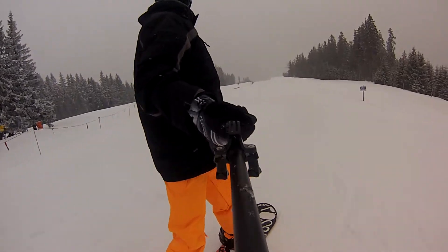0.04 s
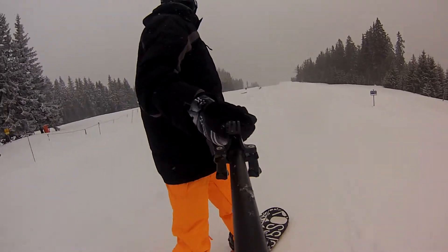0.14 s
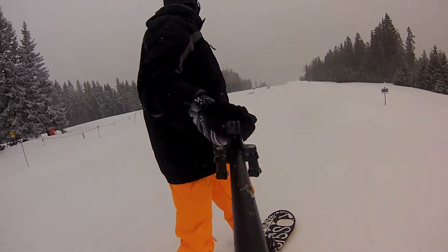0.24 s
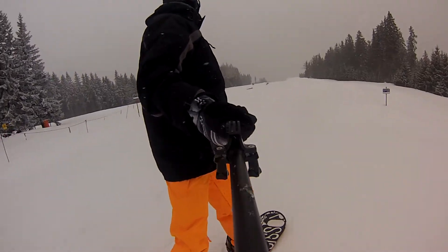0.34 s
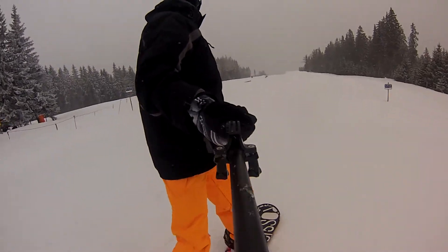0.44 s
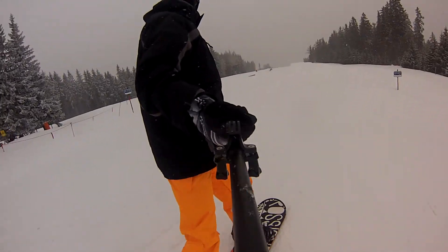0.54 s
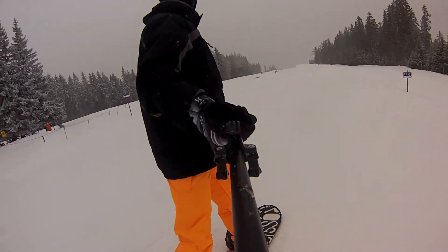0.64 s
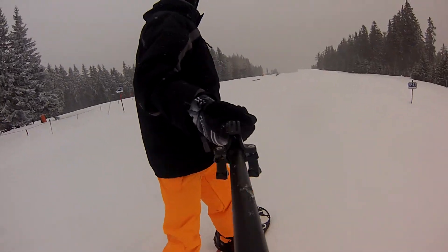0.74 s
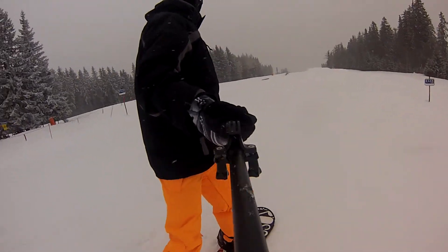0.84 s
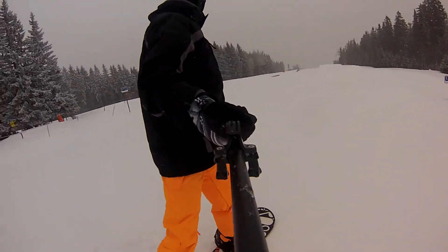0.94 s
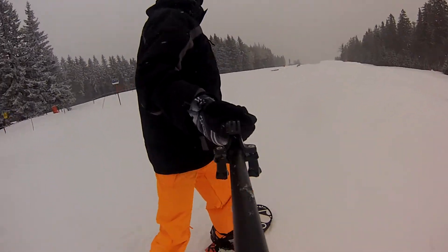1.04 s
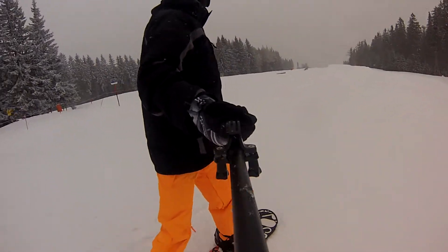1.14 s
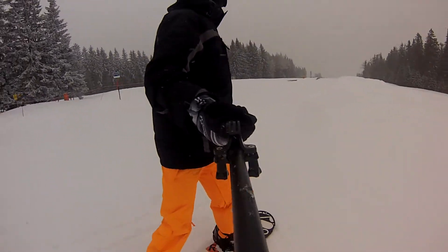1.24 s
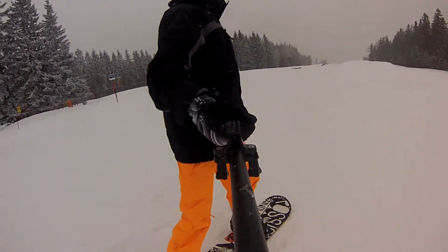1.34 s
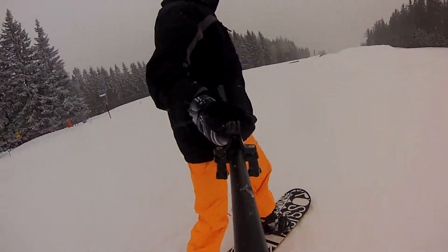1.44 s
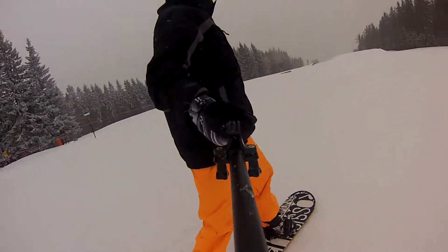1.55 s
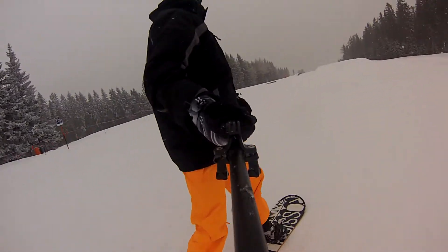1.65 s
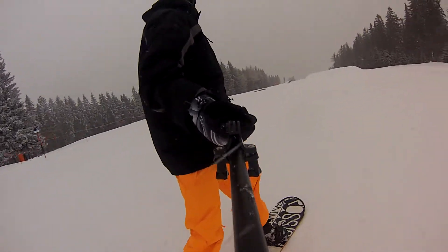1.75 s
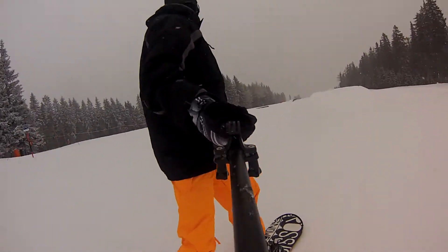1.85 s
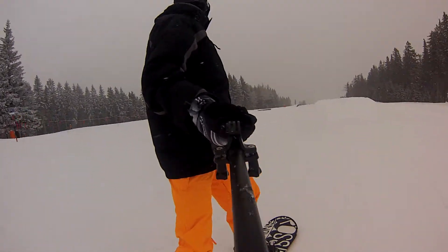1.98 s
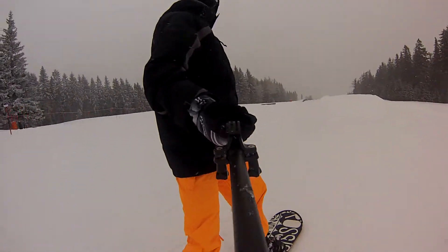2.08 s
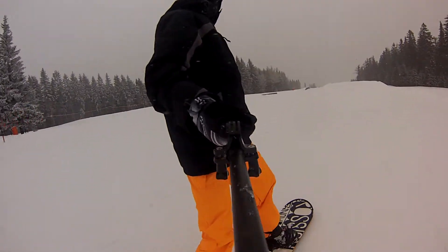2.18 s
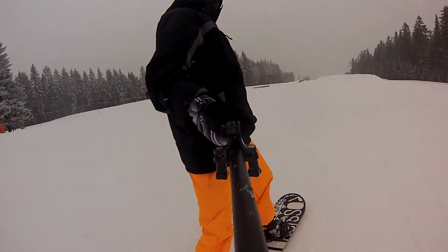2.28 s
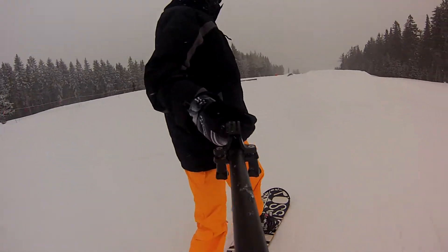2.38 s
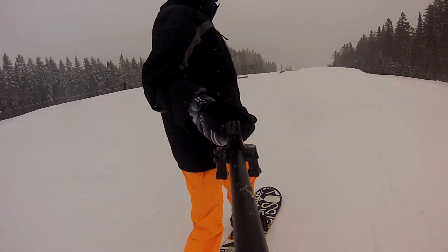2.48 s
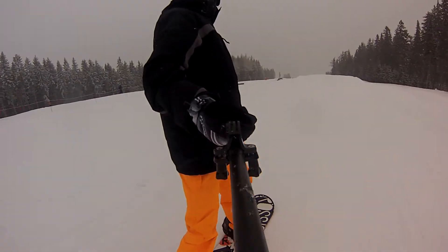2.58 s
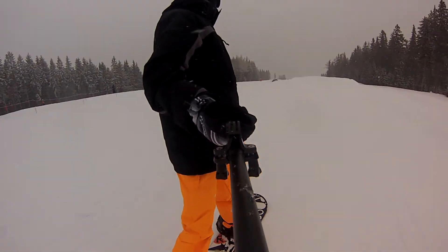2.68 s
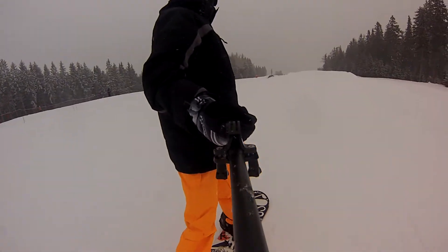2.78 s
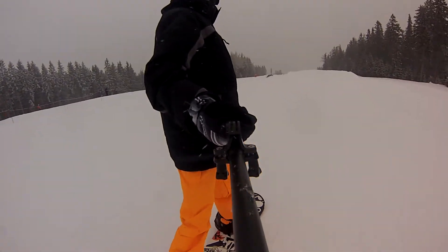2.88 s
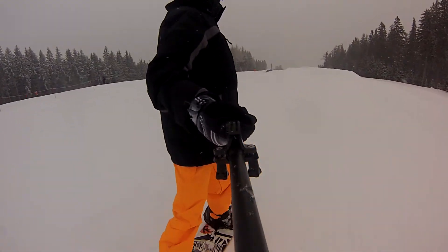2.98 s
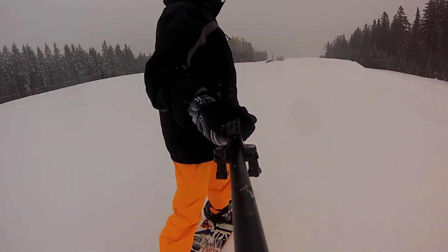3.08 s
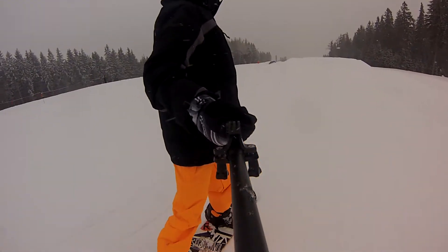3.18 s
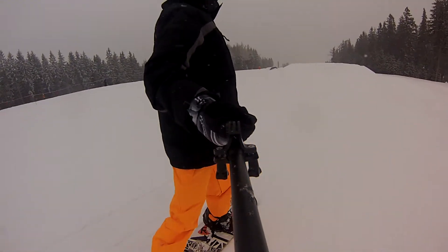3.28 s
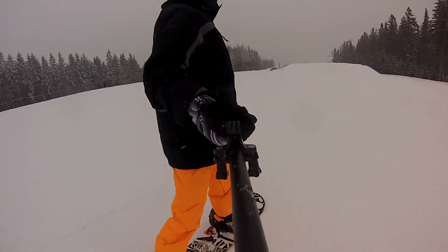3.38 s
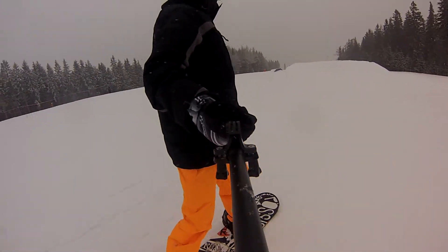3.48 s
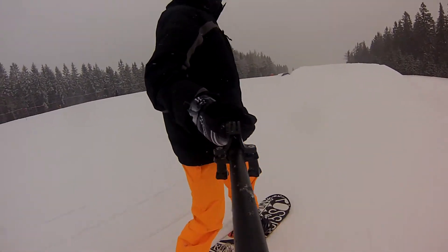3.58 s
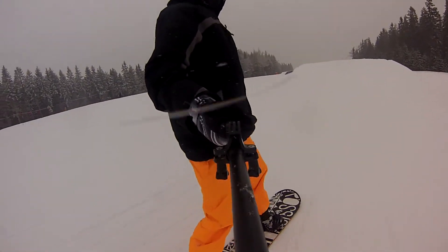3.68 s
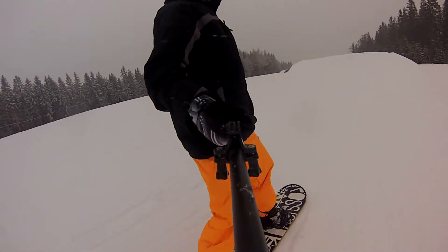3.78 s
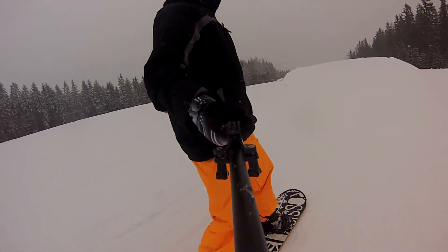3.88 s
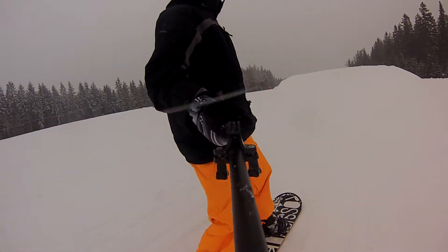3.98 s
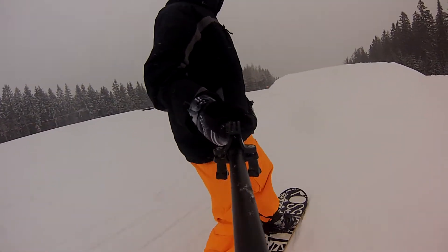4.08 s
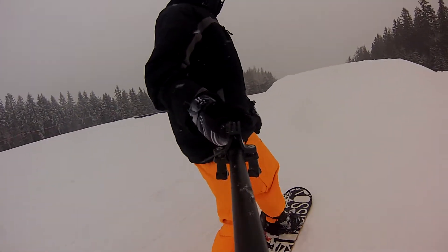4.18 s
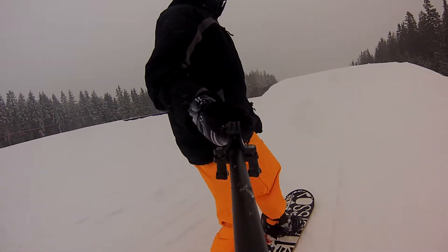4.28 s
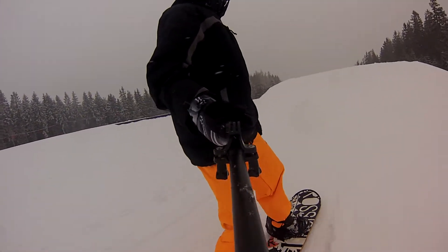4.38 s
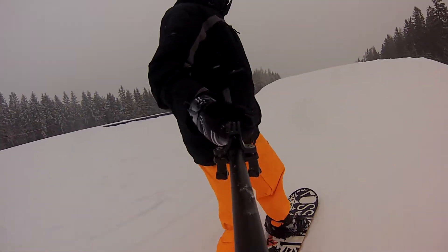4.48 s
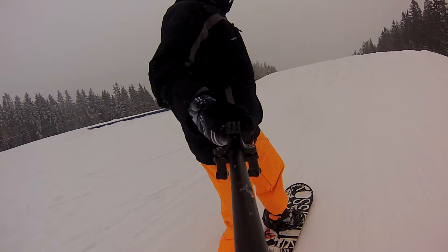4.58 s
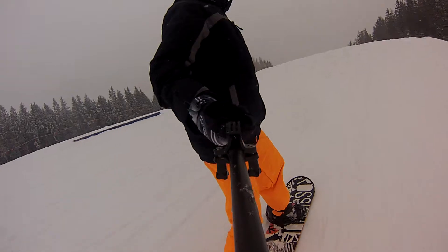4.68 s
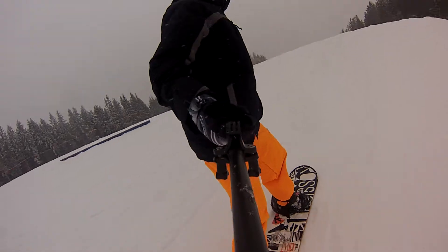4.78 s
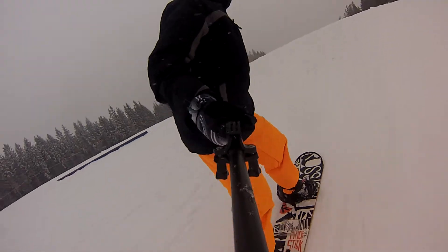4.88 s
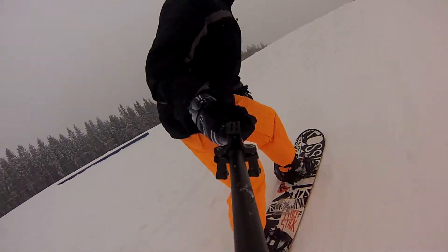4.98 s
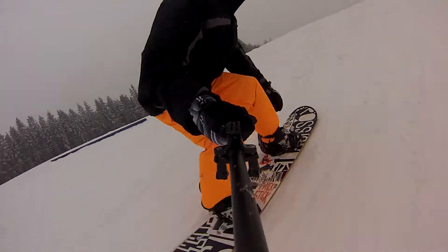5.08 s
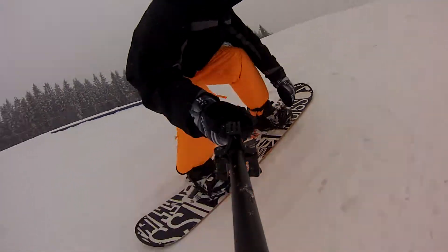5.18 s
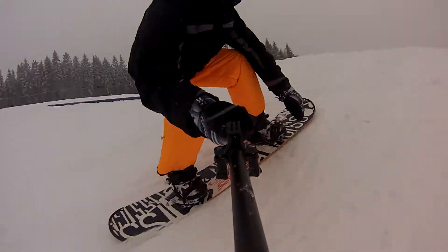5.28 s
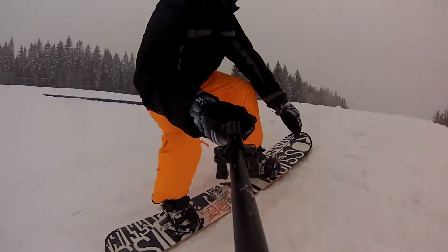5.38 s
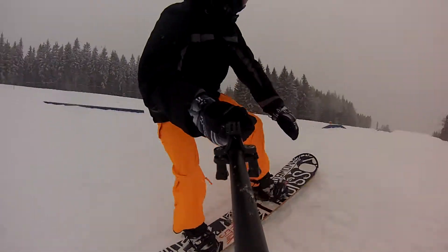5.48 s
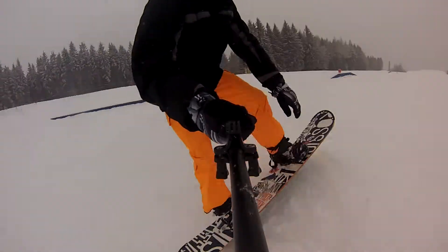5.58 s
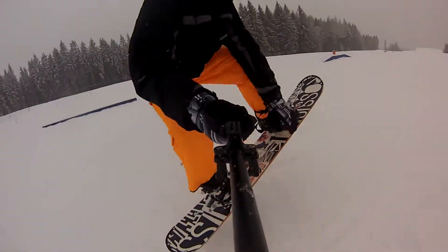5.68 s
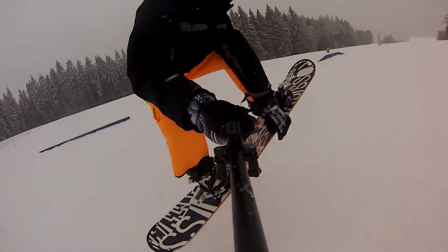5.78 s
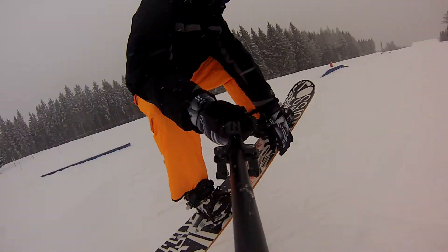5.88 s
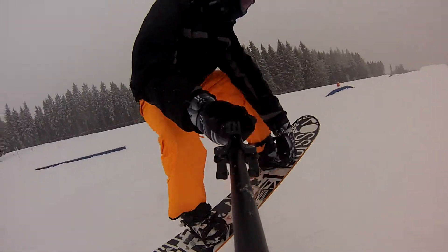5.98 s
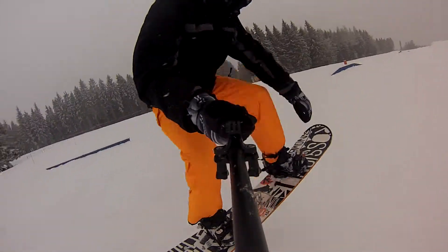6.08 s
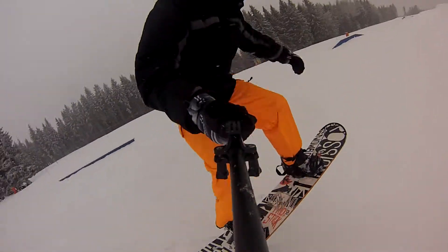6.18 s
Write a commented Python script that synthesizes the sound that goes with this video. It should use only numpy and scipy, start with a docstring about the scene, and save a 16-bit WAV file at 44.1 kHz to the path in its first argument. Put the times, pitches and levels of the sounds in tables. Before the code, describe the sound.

The microphone sits inside a sealed plastic camera case on a hand-held pole, outdoors in falling snow. Throughout, deep wind buffeting swells and sinks softly beneath a weak low drone and steady muffled air, while the snowboard's slide is only a faint boxy drone with fine dusty hiss. Snowflakes tick irregularly on the shell, dry and bright, denser from about 2 to 5 seconds, with sharper clicks near 2.2, 2.9 and 4.7. A slight knock and squeak come at 0.25; a soft rub around 1.4 and knocks from 1.6 to 1.9; single knocks near 3.1 and 4.1. From 5 the wind surges in deep thumps, the drone peaking at 5.3. Strong knocks cluster at 5.25 to 5.35 and 5.58 to 5.65, then from 5.83 to 6.2 a busy clatter mixes with scratchy rubs and very short, falling squeaks, ending abruptly in handling noise and wind.

```python
"""A snow slope in falling snow: a camera in a sealed plastic case rides on a hand-held pole by a snowboarder.
Wind buffets the case: slow noise that swells and sinks, over a weaker drone and a steady rush of air.
Knocks, rubs and squeaks come from the pole, and snowflakes tick on the walls; the board hisses faintly.
Knocks, rubs, flakes and board are pushes that ring the same modes (natural ringing tones) of the case."""
import sys
import numpy as np
from scipy.fft import rfft, irfft, next_fast_len
from scipy.io import wavfile
from scipy.ndimage import map_coordinates

SR = 44100
rng = np.random.default_rng(int(sys.argv[2]) if len(sys.argv) > 2 else 0)


def output_pcm(signal):
    """Save a mono or channel-first signal as 16-bit PCM at the path in sys.argv[1].

    Samples are clipped to [-1, 1] before scaling.
    """
    pcm = np.clip(np.atleast_2d(signal).T, -1, 1) * 32767
    wavfile.write(sys.argv[1], SR, np.round(pcm).astype(np.int16))


N = 275184

# Slow buffeting of the case over time. Columns: time_s, level_db
BUFFET_LEVEL = [(0, -32.5), (.4, -42.5), (1.0, -36.5), (1.35, -32.5), (1.74, -31.5), (1.9, -39.5),
                (2.15, -37), (2.45, -36.5), (2.8, -36), (3.15, -32.5), (3.6, -38.5), (3.95, -31.5),
                (4.3, -36.5), (4.8, -33), (5.1, -24), (5.33, -25.5), (5.55, -20), (5.63, -25.5),
                (5.74, -23), (5.95, -37), (6.05, -27), (6.15, -32.5), (6.24, -27)]
# Spectrum of the buffeting. Columns: frequency_hz, level_db (per Hz)
BUFFET_SPECTRUM = [(4, -30), (8, -9), (17, -3), (30, 0), (45, -2), (58, -8), (86, -22), (113, -30),
                   (170, -57), (290, -120)]
# Ringing modes of the plastic case. Columns: pitch_hz, width_hz, level_db
CASE_MODES = [(155, 81, -1), (324.4, 137, -4.5), (642, 200, 0.5), (801, 156, -1.5), (1355, 450, 3),
              (1524, 355, 3), (1716, 213, 3.5), (2156, 546, 5), (2993, 660, 1), (3500, 845, 1),
              (4857, 1220, 3.5), (5700, 580, -9.5), (6850, 1480, 2.5), (9030, 3650, 4.5),
              (10730, 3200, 4.5), (14350, 2600, -1)]
MODE_HZ, MODE_WIDTH_HZ, MODE_DB = np.transpose(CASE_MODES)

# Knocks that travel up the pole; the three ring levels are relative to the main ring.
# Columns: time_s, main_db (before the pushes below), thud_db, hollow_db, bright_db, strongest_bright_hz
KNOCKS_ON_POLE = [(0.2537, -42, -15, -23, 0, 3010), (1.2539, -42, -22, -26, -11, 2220),
                  (1.3843, -47, -6, -17, -16, 4740), (1.6307, -31, -11, -7.5, -21, 5030),
                  (1.708, -43, 5, -7.5, 6, 2140), (1.8495, -38.5, -4, -11.5, -24, 2970),
                  (1.9107, -44, -24, -19, -8, 2960), (3.0847, -36, -10, -8, -6, 4610),
                  (4.1211, -31.5, -17, -10, -16, 2240), (4.8448, -47, -42, -2, -12, 2190),
                  (5.045, -42, -15, -20, -6, 3300), (5.1627, -42, -12, -21, -7, 2060),
                  (5.2053, -44.5, -4, -2, -5, 2040), (5.213, -40.5, 2, -6, -16, 4630),
                  (5.2204, -47, -1, 3, -11, 2300), (5.2548, -25, -16, -9, -18, 2230),
                  (5.2646, -45, 13.5, -3, -3, 2020), (5.2763, -43, 6, 2, -13, 3340),
                  (5.3086, -23.5, -17, -11, -31, 2310), (5.3239, -35.5, 5, -2, -22, 2130),
                  (5.3362, -37, 0, 0, -20, 2000), (5.3447, -37, -5, -5, -11, 2140),
                  (5.4666, -39, -18, -18, -8, 2000), (5.5278, -55, -3, -3, -4, 2030),
                  (5.5792, -20, -19.5, -23, -16.5, 3730), (5.6091, -30.5, -15, -16, -11, 2780),
                  (5.6364, -30.5, -17, -19, -17, 2000), (5.655, -40, -18, -17, -16, 2180),
                  (5.7377, -43.5, -16, -20, -16, 3740), (5.8266, -35.5, -30, -19, -6, 4760),
                  (5.8436, -27.5, -33, -21, -32, 2100), (5.8612, -28.5, -32, -19, 0.5, 4840),
                  (5.8996, -29, -17, -8.5, -9, 3840), (5.9125, -34, -20, -11, -31, 3800),
                  (5.9216, -26, -18, -16, 2, 2850), (5.9348, -37.5, -32, -19, 10, 2220),
                  (5.948, -28, -29, -24, -34, 2190), (6.0166, -36, -18, -13, -11, 3880),
                  (6.0469, -31.5, -18, -19, -10.5, 2205), (6.0627, -30.5, -14, -14, -11, 3100),
                  (6.0775, -39, -24, -28, -15, 2950), (6.199, -28.5, -22, -17, -9, 2840)]
# Thud, hollow, main, gap, bright and highest ring of a knock. One column: frequency_hz
KNOCK_RING_HZ = [250, 700, 1500, 2200, 3700, 10000]
# Push on each of these rings, relative to its level. One column: push_db
KNOCK_PUSH_DB = [-3.5, -1.5, -7, -14.5, -4.5, -27]

# Rubbing on the pole; hollow and bright are relative to the push.
# Columns: start_s, loudest_s, end_s, push_db (at the loudest moment), hollow_db, bright_db, favoured_hz
RUBS_ON_POLE = [(1.293, 1.43, 1.515, -59, -4.5, -14, 1560), (5.503, 5.536, 5.77, -62, 4, 7.5, 1470),
                (5.834, 5.87, 5.92, -48.5, -25, -4, 1392), (5.891, 5.921, 5.958, -48.5, -10.5, 11.5, 1370),
                (6.01, 6.078, 6.148, -51.5, -21, -1, 1290), (6.163, 6.236, 6.3, -56.5, -16, 5.5, 1490)]
RUB_START_DB, RUB_END_DB = -8, -20.5  # relative to the loudest moment

# Big flakes; low and high ring are relative to the peak.
# Columns: time_s, peak_db (before the pushes below), strongest_ring_hz, low_db, high_db
BIG_FLAKES = [(0.3307, -29, 4800, -15, -9), (0.3434, -34, 4700, -13, -4), (0.389, -32.5, 5070, -14, -3),
              (0.7868, -34, 3070, -12.5, -6), (0.8026, -36, 2100, -14, -7), (0.9265, -28.5, 4740, -11, -5),
              (0.99, -34, 5270, -12, -11), (1.0176, -33.5, 4750, -19, -9), (1.1443, -33, 1990, -9.5, -11),
              (1.2552, -36, 2170, -3.5, -26), (1.3452, -33, 2060, -22, -12), (1.398, -32.5, 4740, -22, -7),
              (1.4623, -27.5, 4620, -8.5, -10), (1.5531, -33, 3580, -11, -23),
              (1.6714, -31.5, 4900, -15, -27), (1.709, -42, 2050, -14, -28.5), (1.733, -34, 2000, -11, 1),
              (1.7377, -32.5, 6900, -17, -10), (1.7868, -32.5, 5200, -11, -14),
              (1.8077, -34.5, 2930, -9, -5), (1.9283, -30, 3090, -14, -9), (1.935, -33, 6580, -18, -17),
              (1.9678, -33, 2246, -11, -10), (2.0174, -35, 4730, -17, -19), (2.0632, -38, 2790, -8, -19),
              (2.0874, -25, 4420, -13, -16), (2.0964, -30, 5330, -7, -10), (2.2106, -29.5, 4470, -7, -4),
              (2.2343, -23.5, 7100, -34, -25), (2.2472, -28, 3280, -7.5, -12),
              (2.4028, -34, 3020, -7.5, -26), (2.4136, -39.5, 3000, -3, -6), (2.5257, -33, 3700, -9, -20),
              (2.5401, -28.5, 5450, -11, -8), (2.5975, -61, 3040, -2, 15), (2.61, -29.5, 3030, -13, -5),
              (2.6923, -28.5, 5750, -20, -11), (2.7684, -32.5, 5100, -7, -5),
              (2.792, -25.5, 3140, -16.5, -16), (2.912, -22.5, 3016, -14.5, -22),
              (2.9647, -27, 2180, -14, -20), (3.0097, -32, 2320, -13, -19), (3.0901, -32.5, 4600, -8, -3),
              (3.1973, -35, 6770, -22, -12), (3.2273, -29.5, 2840, -16, -6), (3.2815, -31.5, 3540, -13, -6),
              (3.3037, -28.5, 3100, -14, -14.5), (3.3403, -31.5, 2030, -14, -22),
              (3.4648, -31.5, 2990, -10, -28), (3.487, -32, 2920, -17, -12),
              (3.5106, -27, 3180, -13.5, -20), (3.55, -27, 5000, -22, -10), (3.6323, -35, 2010, -20, -20),
              (3.65, -32, 6840, -21, -5), (3.681, -31.5, 3110, -9, -12), (3.6947, -33.5, 4860, -4, -28),
              (3.7014, -34, 4600, -1, -4), (3.717, -25, 2930, -15, -8), (3.7883, -38, 2240, -23, -17),
              (3.8614, -27.5, 5230, -20, -10), (3.8822, -30.5, 5020, -17, -8),
              (3.9632, -27.5, 2000, -16, -22), (4.0113, -31, 4770, -13, -23), (4.0184, -27, 2230, -16, -12),
              (4.087, -27.5, 4400, -8, -29.5), (4.0977, -29, 2240, -7, -19), (4.153, -34.5, 4600, -18, -13),
              (4.2059, -32.5, 4810, -4.5, -25), (4.333, -30, 2950, -20, -5),
              (4.3482, -29.5, 4680, -15, -18), (4.4164, -24.5, 4830, -14, -17),
              (4.4294, -30.5, 4690, -11, -11), (4.4584, -29, 2980, -18, -22), (4.5258, -37, 4800, -13, -18),
              (4.5328, -29, 3420, -16, -21), (4.5763, -31, 3430, -16, -19), (4.594, -37, 10800, -26, -1),
              (4.685, -38, 2300, -3, -6), (4.7008, -23, 5730, -13.5, -9), (4.7561, -38, 4940, -13, -14),
              (4.773, -35, 2050, -10, -21), (4.914, -34.5, 4550, -2.5, -12),
              (4.9383, -29.5, 2040, -12, -10), (5.04, -36, 6880, -21, -1), (5.3657, -29, 4860, -18, -12),
              (5.4014, -36.5, 3580, -8, -17), (5.4134, -30, 2000, -16, -11), (5.4193, -26, 4840, -25, -27),
              (5.5736, -26, 2300, -19, -19), (5.6096, -33, 2770, -14, -8), (5.6177, -30, 2060, -10, -8),
              (5.6423, -31, 3520, -10.5, -31), (6.0162, -27.5, 3760, -8.5, -34),
              (6.068, -18.5, 2900, -14, -8), (6.1401, -28.5, 3585, -20, -11),
              (6.1973, -32.5, 4740, -13, -15), (6.2344, -27.5, 4770, -15, -20)]
# Where the rings of a flake are given: three low, one main, one high. One column: frequency_hz
FLAKE_RING_HZ = [500, 1500, 3000, 5500, 11500]
# Push on each ring of a big flake, relative to its level. One column: push_db
FLAKE_PUSH_DB = [-35, -19, -6, -14.5, -6]
BIG_FLAKE_FALL_DB = 9  # each further piece of a breaking big flake is typically this much weaker
# Strength of the small flakes over time, before their spread. Columns: time_s, push_db
SMALL_FLAKE_LEVEL = [(0, -63.5), (1.4, -63.5), (2.1, -59), (2.8, -61.5), (3.6, -59.5), (4.9, -59.5),
                     (6.24, -65.5)]

# Squeaks in the grip of the pole. Columns: start_s, peak_db, pitch_hz (at the start)
GRIP_SQUEAKS = [(0.254, -49.5, 1200), (5.8603, -32, 1390), (5.899, -35, 1340), (5.9102, -26.5, 1340),
                (5.9403, -34.5, 1310), (6.018, -36, 1310), (6.0612, -32, 1245)]
SQUEAK_S, SAG_HZ_PER_S = 0.012, 3500  # length of a squeak, fall of its pitch

# The board's slide over the snow. Columns: time_s, level_db (before a small wobble)
SLIDE_LEVEL = [(0.0, -64), (0.78, -62.5), (1.3, -60), (1.72, -60.5), (2.14, -55.5), (2.78, -59.5),
               (3.81, -56.5), (4.45, -60), (4.97, -57.5), (5.14, -55.5), (5.58, -61.5), (5.91, -61),
               (6.05, -60), (6.24, -56.5)]
# How the slide pushes the case. Columns: frequency_hz, push_db
SLIDE_TILT = [(300, -3.5), (700, -4), (1500, 2), (2300, -15), (4000, -39)]
# How the fine snow dust pushes the case. Columns: frequency_hz, push_db
DUST_TILT = [(1500, -40), (2300, -7.5), (4700, -3), (7000, -3), (11000, -9), (14000, -7)]
DUST_DB, DUST_FOLLOWS = -66.5, 0.32  # mean level; share of the slide's level swings that the dust follows

# Drone of the wind over time. Columns: time_s, level_db (before a small wobble)
DRONE_LEVEL = [(0, -62.5), (.8, -62.5), (1.42, -56.5), (1.7, -60), (2.5, -57), (3.04, -62), (3.45, -58),
               (4.2, -57.5), (4.7, -59), (5.15, -53), (5.3, -45.5), (5.42, -54.5), (6.24, -74)]
# Spectrum of the wind in the pole and case. Columns: frequency_hz, level_db (per Hz)
DRONE_SPECTRUM = [(47, -13.5), (80, -10), (97, 1), (124, -3), (162, 1), (269, -18), (317, -22),
                  (368, -18.5), (520, -21.5), (680, -41), (1140, -120)]
# Spectrum of the steady rush of air past the case. Columns: frequency_hz, level_db (per Hz)
AIR_SPECTRUM = [(150, -22), (250, -0.5), (400, -2.5), (600, -10.5), (1100, -5), (2000, -27)]
AIR_DB = -66.5  # steady level of the rush
TOP_HZ = 16000  # upper band limit of the camera


def buffeting():
    """Eddies of the wind push the case slowly: deep noise that follows the gusts."""
    level_db, = curves(BUFFET_LEVEL)
    return amp(level_db) * noise(BUFFET_SPECTRUM)


def knocks():
    """Pushes of soft contacts on the pole, dull at the top, each with weaker ones close behind."""
    time_s, main, thud, hollow, bright, bright_hz = np.transpose(KNOCKS_ON_POLE)
    rings_over_main = [thud, hollow, 0 * main, bright, bright, bright]
    rings_db = np.transpose(main + rings_over_main) + KNOCK_PUSH_DB
    modes_db = coloured(KNOCK_RING_HZ, rings_db) + favoured(bright_hz, boost_db=9)
    return blows(time_s, modes_db, scatter_db=2.1, crumble_s=0.0028, fall_db=8.8, count=3)


def rub_curves():
    """Level, hollow and bright part and favoured pitch of the rubbing, each swelling to a loudest moment."""
    strokes = []
    for start_s, loudest_s, end_s, push_db, *tone in RUBS_ON_POLE:
        rows = [(start_s, push_db + RUB_START_DB, *tone),
                (loudest_s, push_db, *tone),
                (end_s, push_db + RUB_END_DB, *tone)]
        strokes.append(curves(rows, left=-120, right=-120))
    return np.max(strokes, axis=0)


def rubbing():
    """Pushes of a dense run of tiny uneven slips on the pole that swells and fades."""
    level_db, hollow_db, bright_db, ring_hz = rub_curves()
    time_s = np.sort(rng.random(3500)) * N / SR
    index = (time_s * SR).astype(int)
    rings_db = [hollow_db - 2.5, hollow_db, 0 * level_db, bright_db - 12.5, bright_db, bright_db - 24]
    tone_db = coloured(KNOCK_RING_HZ, np.transpose(rings_db)[index])
    uneven_db = level_db + 3.5 * wobble(150)
    slip_hz = np.maximum(ring_hz[index], 1)  # keeps the pitch valid in the silent gaps
    modes_db = uneven_db[index] + tone_db + favoured(slip_hz, boost_db=6)
    return blows(time_s, modes_db, scatter_db=3, crumble_s=0.001, fall_db=5, count=2)


def big_flakes():
    """Pushes of big flakes at their moments; where one lands sets its colour, and it breaks into pieces."""
    time_s, peak, ring_hz, low, high = np.transpose(BIG_FLAKES)
    rings_db = np.transpose(peak + [low, low, low, 0 * peak, high]) + FLAKE_PUSH_DB
    modes_db = coloured(FLAKE_RING_HZ, rings_db) + favoured(ring_hz, boost_db=8.8)
    return blows(time_s, modes_db, scatter_db=2.1, crumble_s=0.0006, fall_db=BIG_FLAKE_FALL_DB, count=4)


def small_flakes():
    """Pushes of small flakes at random moments, stronger in some clumps and weaker in others."""
    count = 2000
    place = (np.arange(count) + 8 * rng.random(count)) % count  # an even fall, scattered
    time_s = place * N / SR / count
    index = (time_s * SR).astype(int)
    typical_db = curves(SMALL_FLAKE_LEVEL)[0][index]
    spread_db = 3.75 * np.minimum(rng.exponential(size=count), 2.6)
    clumps_db = 4 * wobble(38)[index]
    lean_db = 5 * rng.standard_normal((count, 1)) * [-0.22, 0.1, -0.48, 0.21, 0.64]  # dull to sharp
    rings_db = lean_db + [-36.0, -19, -9.5, -5.0, -8.5]
    modes_db = typical_db + spread_db + clumps_db + coloured(FLAKE_RING_HZ, rings_db)
    return blows(time_s, modes_db, scatter_db=5.24, crumble_s=0.00078, fall_db=3.56, count=3)


def squeaks():
    """Short regular slips in the grip: a tone that swells fast, sags in pitch and fades."""
    out = np.zeros(N + SR)
    t = np.arange(SR // 20) / SR
    shape = np.sin(np.pi * np.sqrt(np.minimum(t / SQUEAK_S, 1)))
    for start_s, peak_db, pitch_hz in GRIP_SQUEAKS:
        cycles = (pitch_hz - SAG_HZ_PER_S * t / 2) * t
        out[round(start_s * SR):][:len(t)] += amp(peak_db) * shape * np.sin(2 * np.pi * cycles)
    return out[:N]


def board():
    """The slide over snow drones in the low modes of the case; fine snow dust hisses in the high ones."""
    slide_db, = curves(SLIDE_LEVEL)
    dust_db = DUST_DB + DUST_FOLLOWS * swings(slide_db)
    slide = amp(slide_db + 1.53 * wobble(45)) * steady_ringing(SLIDE_TILT)
    dust = amp(dust_db + 1.8 * wobble(40)) * steady_ringing(DUST_TILT)
    return slide + dust


def wind_drone():
    """Wind in the pole and case: a noisy drone whose level wanders."""
    level_db, = curves(DRONE_LEVEL)
    return amp(level_db + 2.6 * wobble(18)) * noise(DRONE_SPECTRUM)


def air_rush():
    """Air flowing past the case: steady coloured noise."""
    return amp(AIR_DB) * noise(AIR_SPECTRUM)


def case(pushes):
    """Each mode is driven through the wall, so its ring swells for a few cycles, then dies; modes are summed."""
    hz, width, db = MODE_HZ[:, None], MODE_WIDTH_HZ[:, None], MODE_DB[:, None]
    # Neighbouring low modes swing in opposite directions.
    turn = np.where(hz < 2000, (-1) ** np.arange(len(CASE_MODES))[:, None], 1)
    # With this gain a unit impulse swings a mode to about 1, before the mode's own level.
    gain = turn * amp(db) * SR * np.e * width / (2 * np.pi)

    def modes(f):
        resonance = 1j * f / (hz * hz - f * f + 1j * f * width)
        return gain * resonance ** 2  # squared: a swell before the decay

    return filtered(pushes, modes).sum(axis=0)


def steady_ringing(tilt):
    """Random noise pushes every mode of the case without pause; the result has an average (rms) size of 1."""
    points_hz, push_db = np.transpose(tilt)
    push = amp(coloured(points_hz, [push_db])) * rng.standard_normal((len(CASE_MODES), N))
    return unit(case(push))


def blows(time_s, db, scatter_db, crumble_s, fall_db, count):
    """Impulses for each mode (db: modes x blows); each blow is count pieces, the first followed by weaker ones."""
    piece = np.arange(count)
    chance = rng.standard_normal((len(time_s), len(CASE_MODES) + 2 * count))
    mode_chance, size_chance, delay_chance = np.split(chance, [len(CASE_MODES), len(CASE_MODES) + count], axis=1)
    size = amp(db + scatter_db * mode_chance.T)
    delay_s = np.cumsum(np.abs(delay_chance), axis=1) * crumble_s * (piece > 0)
    part = amp(-fall_db * piece) * np.where(piece > 0, size_chance, 1)
    at = np.round((time_s[:, None] + delay_s) * SR)
    at = np.clip(at, 0, N - 1).astype(int).ravel()
    return np.array([np.bincount(at, (row[:, None] * part).ravel(), N) for row in size])


def coloured(points_hz, colours_db):
    """Level of every mode for each row of colours: modes x rows."""
    return np.array([along(MODE_HZ, points_hz, row) for row in colours_db]).T


def favoured(ring_hz, boost_db):
    """A blow favours the modes near the pitch that swings most where it lands: modes x blows."""
    octaves = np.log2(MODE_HZ[:, None] / ring_hz)
    return boost_db * np.exp(-(octaves / 0.13) ** 2)


def amp(db):
    """Decibels to gain."""
    return 10 ** (np.asarray(db) / 20)


def unit(x):
    """Scaled to an average (rms) size of 1."""
    return x / np.sqrt(np.mean(x ** 2) + 1e-20)


def swings(db):
    """A level curve around its mean."""
    return db - db.mean()


def along(hz, points_hz, values):
    """Values joined by straight lines on a log frequency axis."""
    return np.interp(np.log(hz + 1), np.log(np.asarray(points_hz) + 1), values)


def curves(rows, **ends):
    """One value per sample for each column after the time."""
    time_s, *columns = np.transpose(rows)
    return [np.interp(np.arange(N) / SR, time_s, column, **ends) for column in columns]


def wobble(rate):
    """A smooth random curve through rate random points a second."""
    points = rng.standard_normal(int(N * rate / SR) + 4)
    return map_coordinates(points, [np.arange(N) * rate / SR])


def filtered(x, response):
    """x times a response that depends on frequency, with room at the end for the ringing."""
    size = next_fast_len(N + SR // 4)
    spectrum = rfft(x, size) * response(np.fft.rfftfreq(size, 1 / SR))
    return irfft(spectrum, size)[..., :N]


def noise(spectrum):
    """Random noise coloured by a spectrum, with an average (rms) size of 1."""
    points_hz, level_db = np.transpose(spectrum)
    return unit(filtered(rng.standard_normal(N), lambda hz: amp(along(hz, points_hz, level_db))))


def scene():
    """All sources at the one microphone inside the case."""
    struck_case = case(knocks() + rubbing() + big_flakes() + small_flakes())
    mono = buffeting() + struck_case + squeaks() + board() + wind_drone() + air_rush()
    return mono[None]


def record(dry):
    """The camera's treble fades toward its band limit and ends there."""
    return filtered(dry, lambda hz: amp(along(hz, [14800, 15900], [0, -22])) * (hz < TOP_HZ))


dry = scene()
out = record(dry)
output_pcm(out)
```